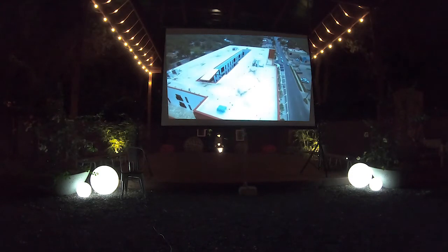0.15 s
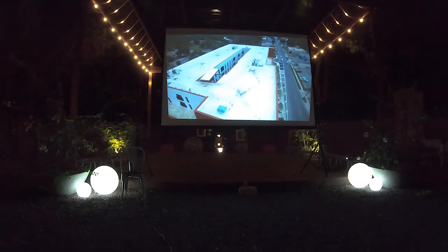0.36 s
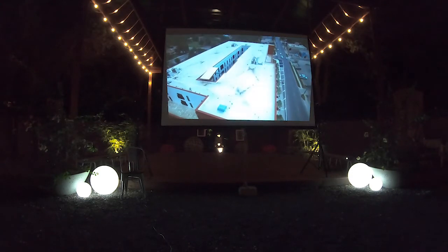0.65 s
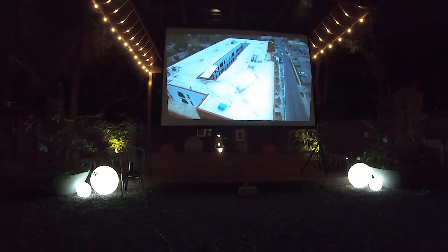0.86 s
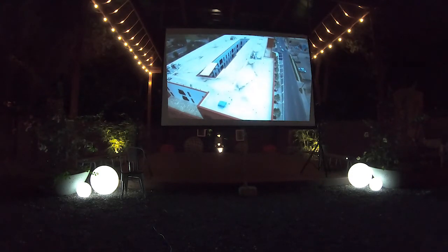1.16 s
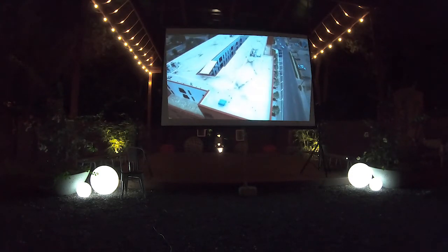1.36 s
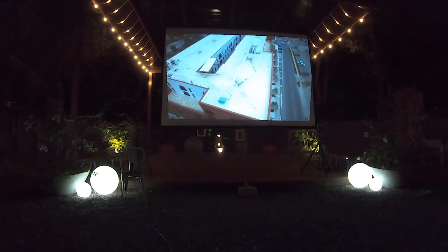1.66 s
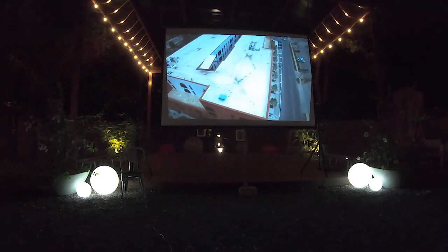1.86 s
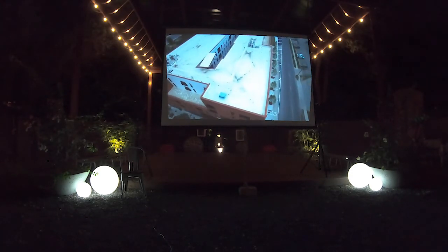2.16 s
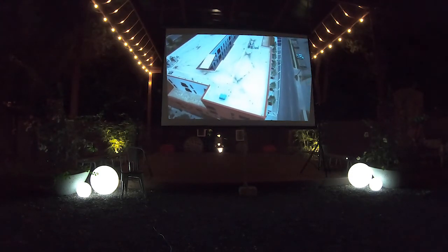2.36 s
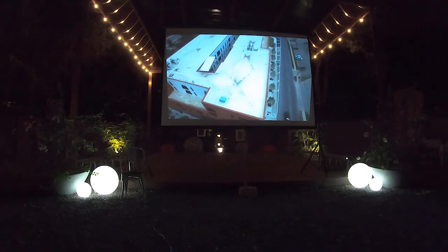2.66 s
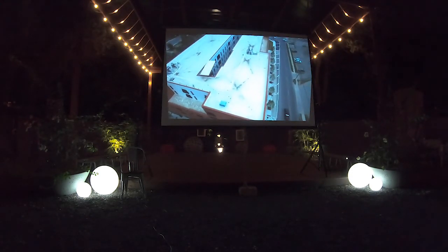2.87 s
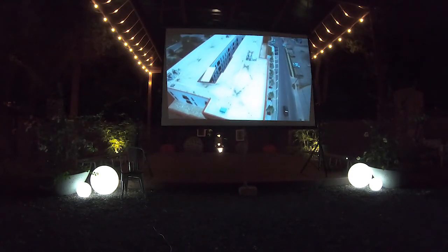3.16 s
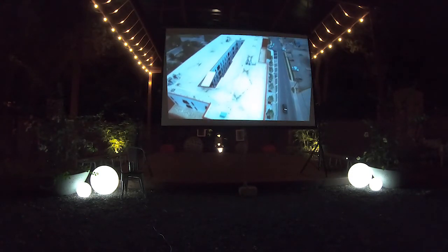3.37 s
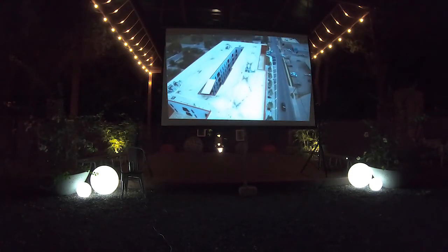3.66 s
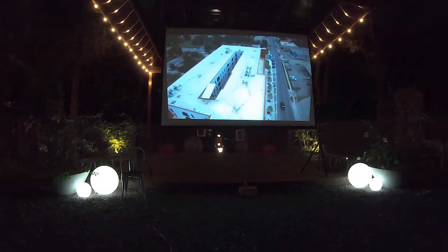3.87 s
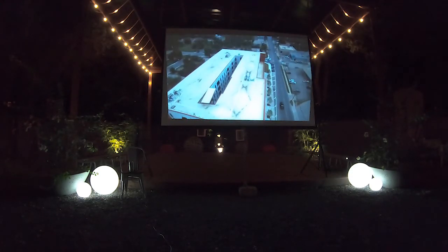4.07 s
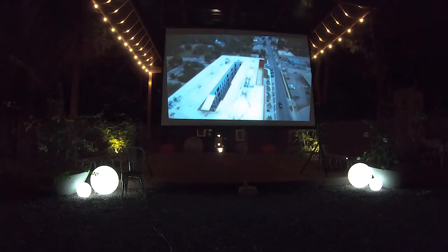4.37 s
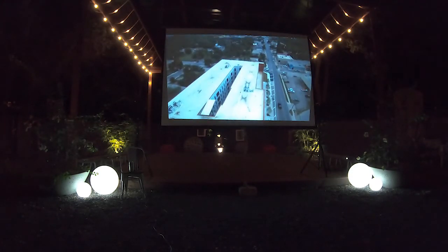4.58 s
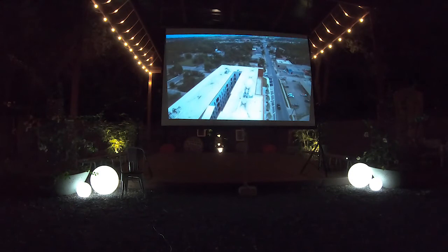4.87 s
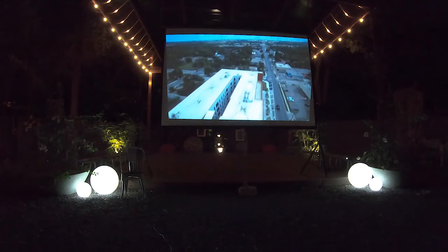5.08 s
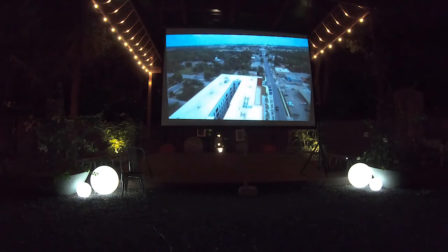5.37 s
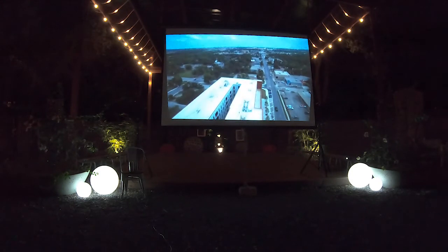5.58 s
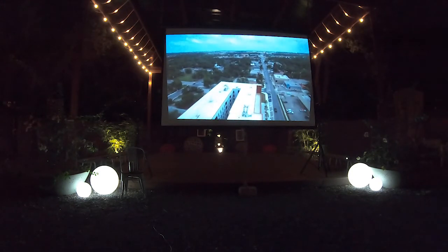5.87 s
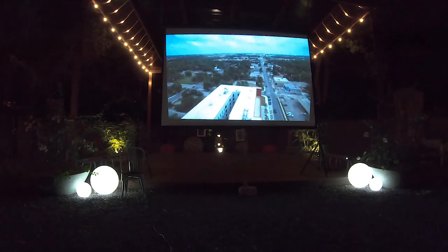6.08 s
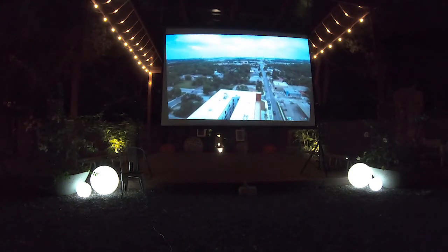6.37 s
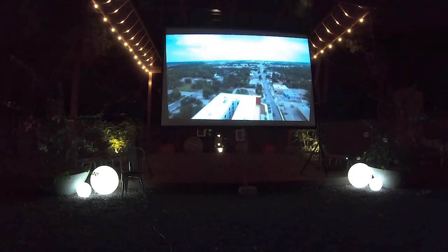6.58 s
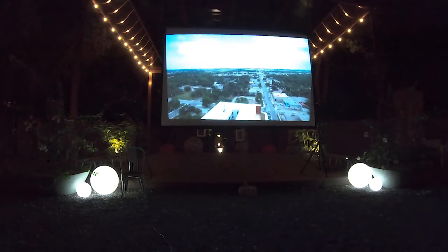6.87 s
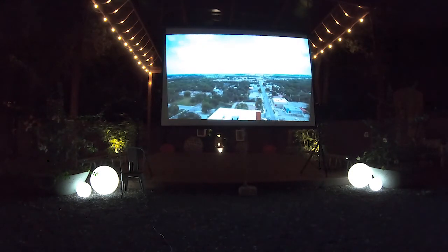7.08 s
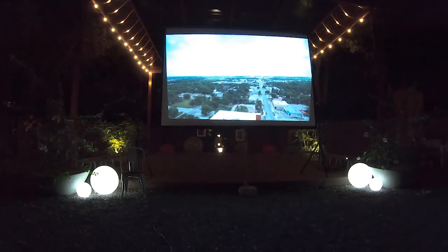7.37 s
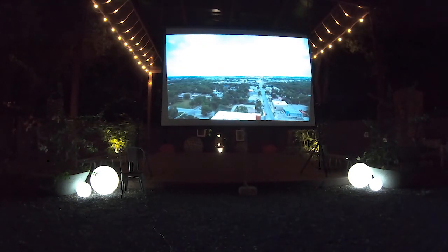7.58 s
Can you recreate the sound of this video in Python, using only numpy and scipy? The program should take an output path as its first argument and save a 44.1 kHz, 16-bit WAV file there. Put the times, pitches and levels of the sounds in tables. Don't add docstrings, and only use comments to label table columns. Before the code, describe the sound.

Regular cricket chirps lead throughout, blended from many singers at a distance, rounded and shimmering. A faraway road hums continuously underneath, with soft engine drone and muffled heavy-vehicle thumps between about four and five seconds. A lone cricket trills very faintly at a higher pitch, leaves barely stir, and fine hiss sits on top. Quiet open courtyard at night, captured in mono by one fixed microphone, without close events.

```python
import sys
import numpy as np
from scipy import signal
from scipy.fft import rfft, irfft, next_fast_len
from scipy.io import wavfile
from scipy.ndimage import uniform_filter1d

SR = 44100
rng = np.random.default_rng(int(sys.argv[2]) if len(sys.argv) > 2 else 0)


def put_to_file(sound):
    columns = np.atleast_2d(sound).T
    safe = np.clip(columns, -1, 1)
    whole_steps = np.round(safe * 32767)
    wavfile.write(sys.argv[1], SR, whole_steps.astype(np.int16))


def invert_db(level):
    return 10 ** (np.asarray(level, dtype=float) / 20)


N = 340452

# middle t/s, peak level/dB, length as a share of the usual
CHORUS_CHIRPS = [(-.01, -27.5, 0.75), (.319, -25.5, 0.85), (.675, -27, 0.93), (1.07, -28, 1.27),
                 (1.435, -27.5, 1.02), (1.8, -27, 1.03), (2.17, -25, 0.87), (2.541, -27.5, 1.1),
                 (2.923, -27.5, 1.05), (3.29, -28, 1.2), (3.652, -28.5, 1.24), (4.024, -28, 1.13),
                 (4.385, -26.9, 1.05), (4.785, -27.5, 1.2), (5.16, -25.5, 0.84), (5.51, -27, 1.1),
                 (5.896, -27.5, 1.05), (6.255, -27.5, 0.94), (6.615, -28, 1.05), (6.989, -25, .9),
                 (7.352, -26.5, .95), (7.72, -25, 0.69)]


def chorus(count=25):
    carrier_hz, spread_hz, glide_hz, strokes_per_s = 2964.6, 92, 293, 60
    swell_s, fade_s, stragglers_db = 0.059, 0.057, -35.5
    octave_base_db, octave_lead_s = -31.5, 0.02
    wing_hz, wing_width_hz, wing_share = 2990, 180, 0.19

    middle, peak_db, length = np.transpose(CHORUS_CHIRPS)
    rise, fall = swell_s * length, fade_s * length
    level_db = swells(middle, peak_db, rise, fall, stragglers_db)
    octave_db = octave_base_db + swells(middle - octave_lead_s, peak_db, rise, fall, stragglers_db)

    tempo, start = rng.uniform(-1, 1, (2, count, 1))
    onsets = (np.arange(640) + start) / (strokes_per_s * (1 + 0.25 * tempo))
    heard = (onsets > 0) & (onsets < N / SR)
    force, tune, turn = rng.standard_normal((3, *onsets.shape))[:, heard, None]

    place = np.arange(400) / 400
    hz = carrier_hz + spread_hz * tune + glide_hz * (0.25 - 0.5 * place)
    phase = 3 * turn + 2 * np.pi * np.cumsum(hz, axis=1) / SR
    loud = invert_db(2.2 * force - 4.2 * np.abs(tune))
    at = (onsets[heard, None] * SR).astype(int) + np.arange(len(place))

    tone_strokes = loud * stroke(place, 0.94, 0.85) * np.sin(phase)
    tone = np.bincount(at.ravel(), tone_strokes.ravel(), N)[:N]
    octave_strokes = loud * stroke(place, 0.57, 0.57) * np.sin(2 * phase)
    octave = np.bincount(at.ravel(), octave_strokes.ravel(), N)[:N]

    ringing = wing_share * resonate(tone, wing_hz, wing_width_hz)
    fundamental = invert_db(level_db) * blended(rms_one(tone) + ringing)
    return fundamental + invert_db(octave_db) * blended(octave)


def stroke(place, duty, lean):
    inside = np.clip(place / np.clip(duty, 0.2, 1), 0, 1)
    return np.sin(np.pi * inside ** lean) ** 2


def blended(x):
    window_s, evenness = 0.096, 0.43
    power = uniform_filter1d(x ** 2 + 1e-12, int(window_s * SR))
    return rms_one(x / power ** (evenness / 2))


# f/Hz, density level/dB per Hz
RUMBLE_SPECTRUM = [(15, -88), (25, -62), (54, -27), (90, -2.5), (119, 1), (140, 0), (168, -14),
                   (231, -13.5), (300, -15), (390, -53), (660, -120)]
# f/Hz, density level/dB per Hz
TYRE_SPECTRUM = [(150, -6), (300, -14.5), (500, -13.5), (680, -9.5), (860, 0.5), (1100, -9), (1500, -16),
                 (2200, -23.5), (3200, -22.5), (4500, -36.5)]
# t/s, level/dB
TYRE_LEVELS = [(0, -38.5), (.5, -39), (1.6, -38.5), (2.4, -38), (3.9, -37.3), (4.35, -38.5), (5.2, -38),
               (5.6, -39), (6.1, -37.5), (6.9, -38.5), (7.72, -38.5)]


def road():
    rumble = invert_db(-45.5) * coloured(RUMBLE_SPECTRUM)
    roar_db = in_time(TYRE_LEVELS)[0] + 1.74 + 0.15 * drift(3.03)
    roar = invert_db(roar_db) * coloured(TYRE_SPECTRUM)
    return rumble + roar + engine() + lorries()


# t/s, firing f/Hz, level/dB
ENGINE_NOTE = [(0, 104, -52), (.8, 118, -40), (1.15, 110, -44), (1.6, 114, -43), (2.4, 97, -50),
               (2.9, 101, -55), (3.35, 113, -44), (4.0, 110, -49), (4.6, 107, -40.5), (5.1, 117, -50),
               (5.5, 106, -53), (6.3, 106, -44), (6.75, 121, -40), (7.72, 138, -40.5)]


def engine():
    hz, level_db = in_time(ENGINE_NOTE)
    note = np.sqrt(2) * np.sin(2 * np.pi * np.cumsum(hz + 2.38 * drift(11)) / SR)
    return invert_db(level_db - 3.0 + 1.2 * drift(6.2)) * note


# middle t/s, half-length t/s, level/dB
LORRY_PASSES = [
    (3.3, 0.83, -46.5),
    (4.467, 0.15, -39.5),
    (4.867, 0.063, -33.5),
    (5.145, 0.11, -37),
    (6.497, 0.33, -48.5),
    (7.7, 0.14, -42.5),
]


def lorries():
    boom_hz, width_hz = 116, 134
    middle, half, db = np.transpose(LORRY_PASSES)
    boom = resonate(rng.standard_normal(N), boom_hz, width_hz)
    boom = resonate(boom, boom_hz, width_hz)
    return invert_db(swells(middle, db, half, half, -70.0)) * boom


# start t/s, level/dB
TRILL_PHRASES = [(0, -59.5), (.52, -59), (.93, -57), (1.3, -56), (1.55, -60.5), (1.85, -58.5), (3.2, -57.5),
                 (4.1, -57), (4.3, -59.5), (4.68, -71), (4.87, -58), (5.3, -57.5), (6.5, -59.5),
                 (7.45, -55.5)]
TRILL_PITCHES = [3774, 3761, 3774, 3774, 3773, 3760, 3771, 3773, 3770, 3772, 3779, 3761, 3770, 3775]
TRILL_LINES = [-25, -7, -6.5, -1, -7, -10.5, -23]


def triller():
    teeth, first_line, slur_s = 50, 47, 0.06
    start, phrase_db = np.transpose(TRILL_PHRASES)
    phrase = np.searchsorted(start[1:], np.arange(N) / SR)
    slur = int(slur_s * SR)
    hz = uniform_filter1d(np.array(TRILL_PITCHES, float)[phrase], slur)
    level_db = uniform_filter1d(phrase_db[phrase], slur)
    strokes = np.cumsum((hz + 5.3 * drift(22)) / SR) / teeth

    trill = np.zeros(N)
    for k, db in enumerate(TRILL_LINES, start=first_line):
        fading = invert_db(db + 1.8 * drift(4.8) + 3.5 * drift(27))
        trill += fading * np.sin(2 * np.pi * k * strokes + rng.uniform(0, 4.3))
    return invert_db(level_db + 6.5) * trill


# f/Hz, bandwidth/Hz, level/dB
FAR_SINGERS = [(3506, 190, -58), (3804, 110, -59), (5330, 120, -89), (7050, 150, -73.5), (9340, 260, -72.5),
               (9830, 150, -85), (10300, 150, -74), (11380, 100, -89), (12530, 230, -66.5),
               (13620, 280, -70), (13000, 120, -80)]


def far_insects():
    hiss = np.zeros(N)
    for hz, width_hz, db in FAR_SINGERS:
        hiss += invert_db(db + 0.3 * drift(2.95)) * resonate(rng.standard_normal(N), hz, width_hz)
    return hiss


# middle t/s, half-length t/s, level/dB
LEAF_GUSTS = [
    (.33, .07, -62),
    (3.6, .1, -65),
    (3.93, 0.095, -60),
    (7.72, 0.092, -66),
]


def leaves():
    middle, half, db = np.transpose(LEAF_GUSTS)
    rustle = resonate(rng.standard_normal(N), hz=4470, width_hz=1300)
    return invert_db(swells(middle, db, half, half, -73)) * rustle


def mains_hum():
    return invert_db(-64) * np.sin(2 * np.pi * 60 * np.arange(N) / SR)


# f/Hz, density level/dB per Hz
AIR_SPECTRUM = [(1500, -19), (2500, -30), (3400, 8), (4000, -5), (5300, -2.5), (6600, -7), (8200, -7.5),
                (9300, -5), (11000, -3), (12200, -6), (14000, -5.5), (16000, -10.5)]


def night_air():
    return invert_db(-52.5) * coloured(AIR_SPECTRUM)


def in_time(rows):
    s, *columns = np.transpose(rows)
    return [np.interp(np.arange(N) / SR, s, c) for c in columns]


def rms_one(x):
    return x / np.sqrt(np.mean(x ** 2) + 1e-20)


def drift(rate):
    knots = rng.standard_normal(400)
    steps = np.arange(N // 64 + 2) * 64 / SR * rate
    eased = steps - np.sin(2 * np.pi * steps) / (2 * np.pi)
    coarse = np.interp(eased, np.arange(400), knots)
    return np.repeat(coarse, 64)[:N]


def coloured(spectrum):
    hz, level_db = np.transpose(spectrum)
    size = next_fast_len(N)
    bins = np.maximum(np.fft.rfftfreq(size, 1 / SR), 1)
    shape = invert_db(np.interp(np.log(bins), np.log(hz), level_db, -99, -99))
    return rms_one(irfft(rfft(rng.standard_normal(size)) * shape, size)[:N])


def resonate(x, hz, width_hz):
    r = np.exp(-np.pi * width_hz / SR)
    a = [1, -2 * r * np.cos(2 * np.pi * hz / SR), r * r]
    once = signal.lfilter([1, 0, -1], a, x)
    return rms_one(signal.lfilter([1, 0, -1], a, once))


def swells(middle_s, level_db, rise_s, fall_s, floor_db):
    away = np.arange(0, N + 64, 64) / SR - np.reshape(middle_s, (-1, 1))
    rise, fall = np.reshape(rise_s, (-1, 1)), np.reshape(fall_s, (-1, 1))
    bells = np.exp(-0.5 * (away / np.where(away < 0, rise, fall)) ** 2)
    power = invert_db(level_db) ** 2 @ bells + invert_db(floor_db) ** 2
    return np.interp(np.arange(N) / 64, np.arange(len(power)), 10 * np.log10(power))


def scene():
    singers = chorus() + triller() + far_insects()
    surroundings = road() + leaves() + mains_hum() + night_air()
    return (singers + surroundings)[None]


def roll_off(x):
    return signal.sosfilt(signal.butter(12, 16390, fs=SR, output="sos"), x)


def record(dry):
    ceiling, fade_s, cutoff_hz = 0.3, 0.004, 15730
    envelope = np.abs(signal.hilbert(dry, next_fast_len(N)))[:, :N] / ceiling + 1e-9
    fade = np.clip((N - np.arange(N)) / (fade_s * SR), 0, 1)
    mix = dry * np.tanh(envelope) / envelope * fade
    top_cut = signal.ellip(12, 0.5, 60, cutoff_hz, fs=SR, output="sos")
    mix = signal.sosfilt(top_cut, mix)
    return roll_off(mix)


dry = scene()
out = record(dry)
put_to_file(out)
```